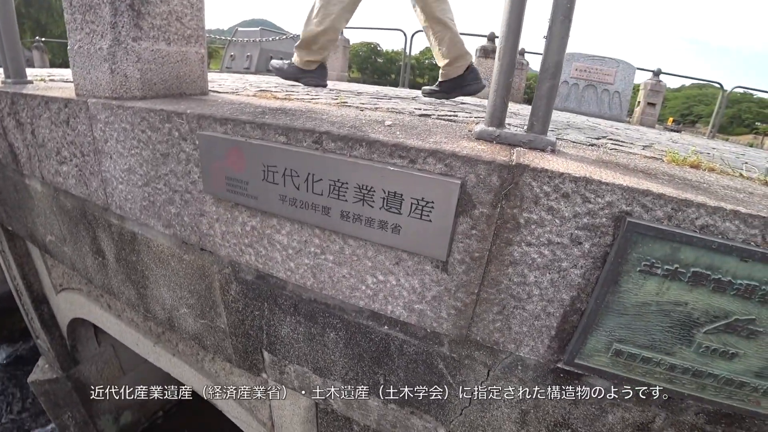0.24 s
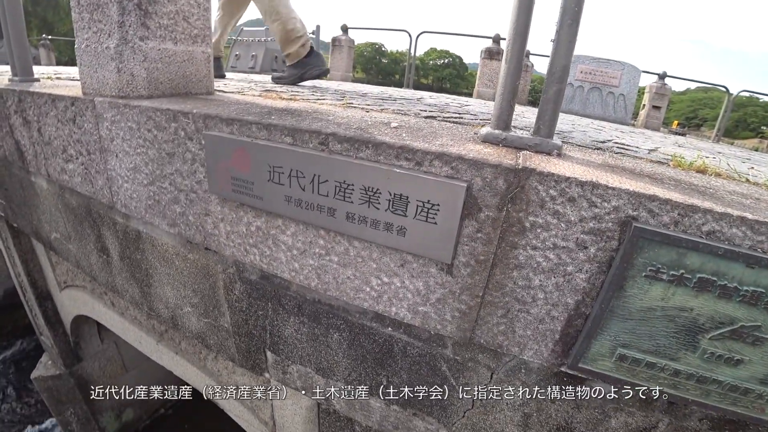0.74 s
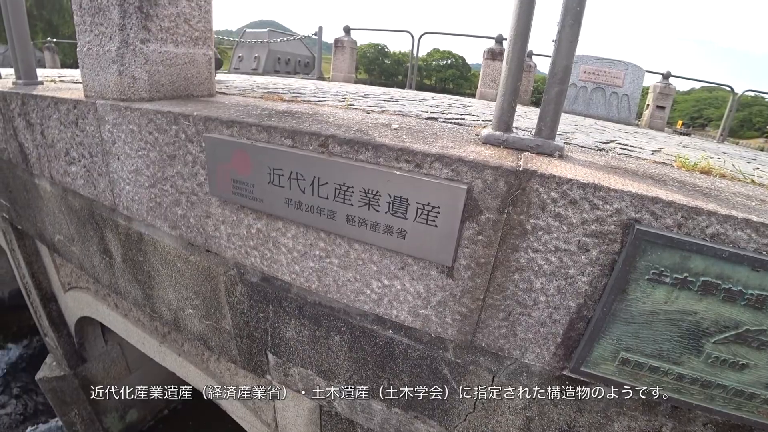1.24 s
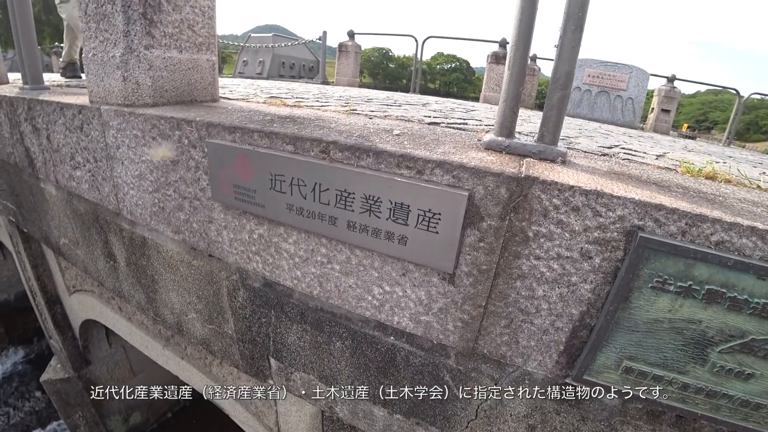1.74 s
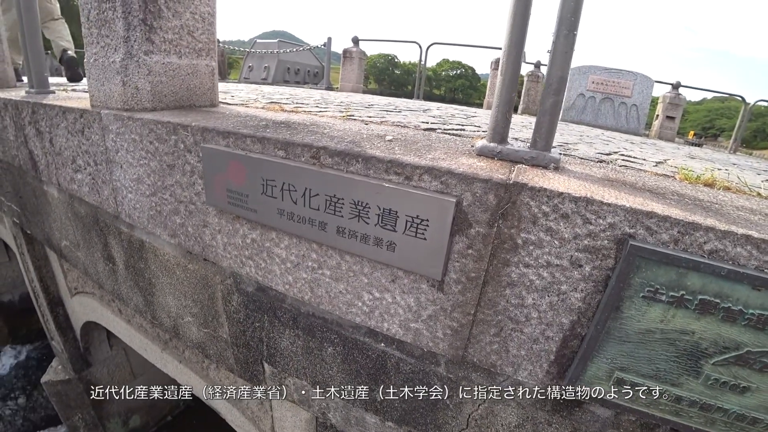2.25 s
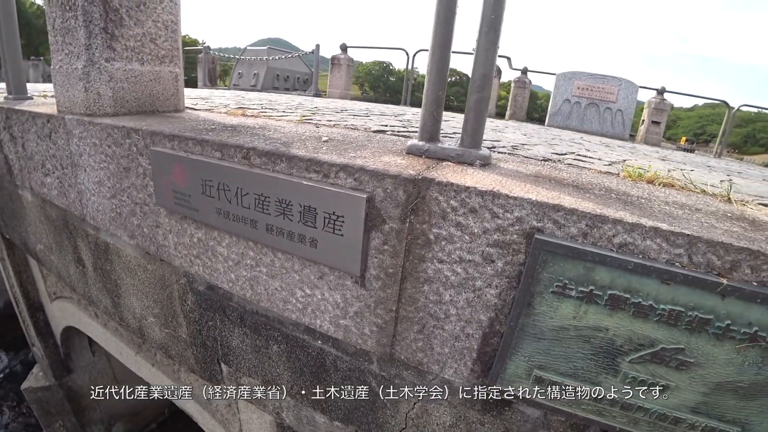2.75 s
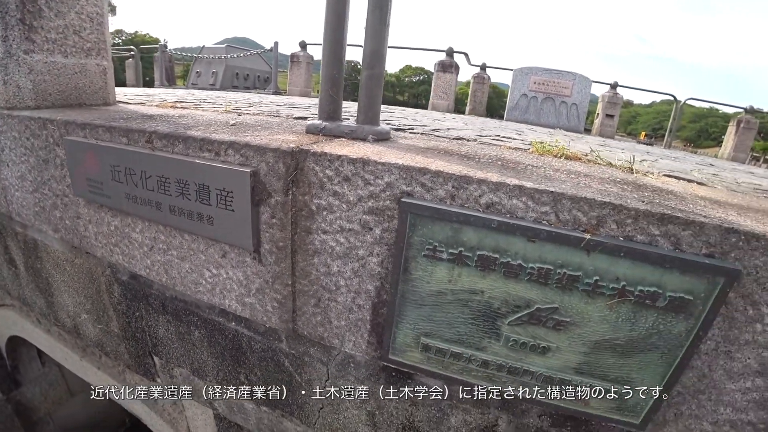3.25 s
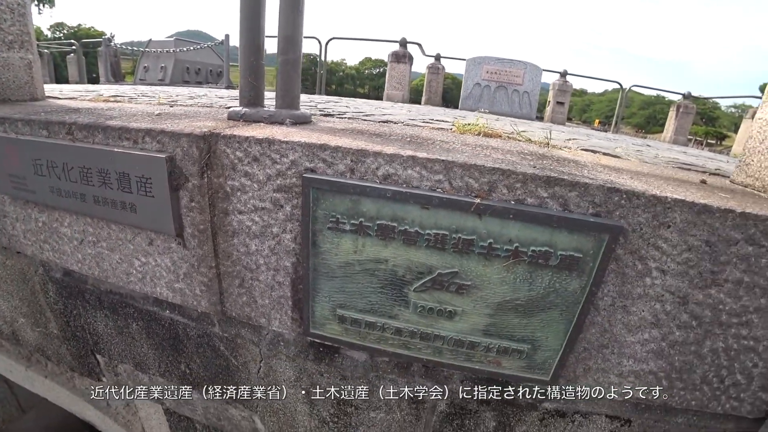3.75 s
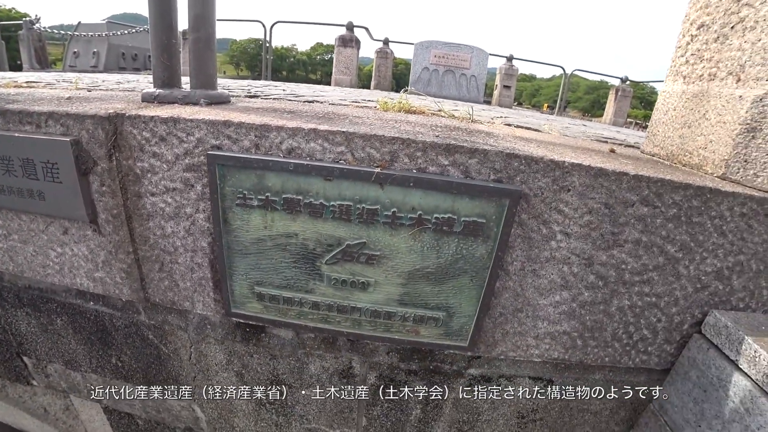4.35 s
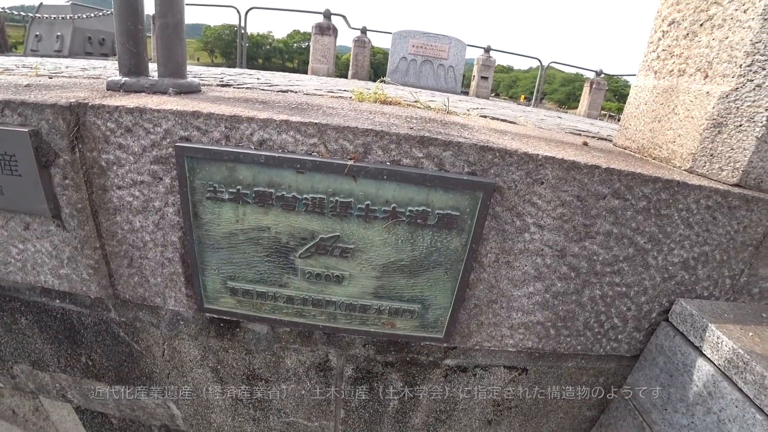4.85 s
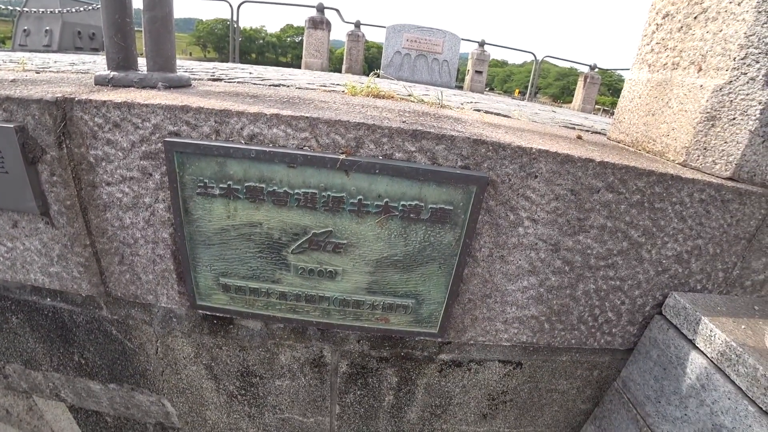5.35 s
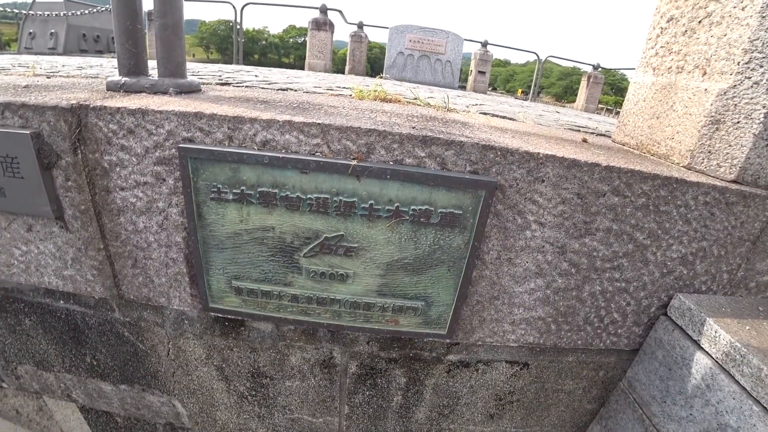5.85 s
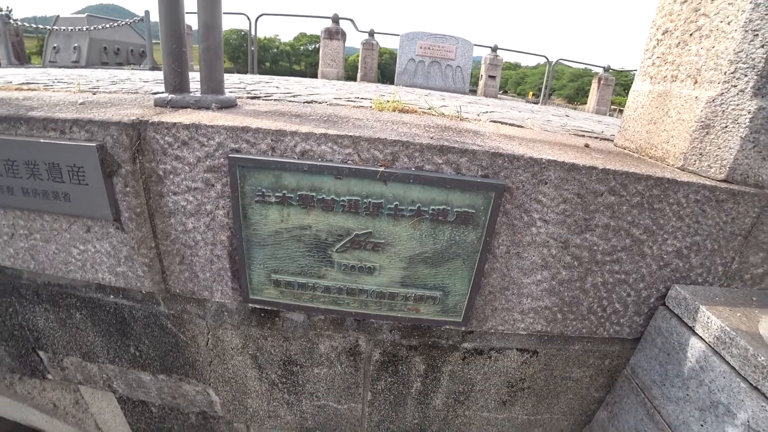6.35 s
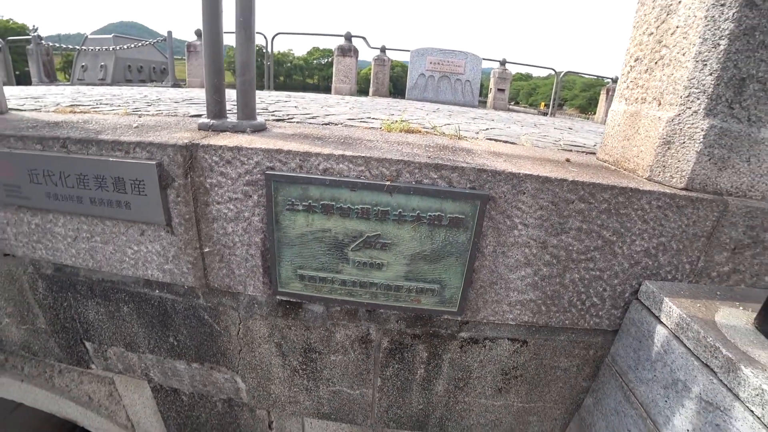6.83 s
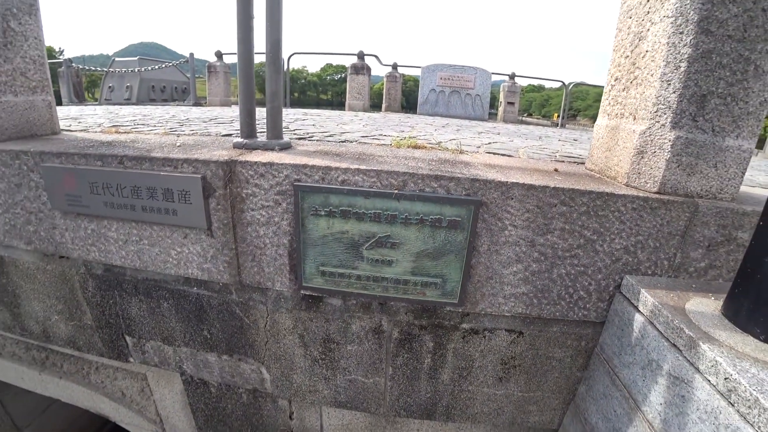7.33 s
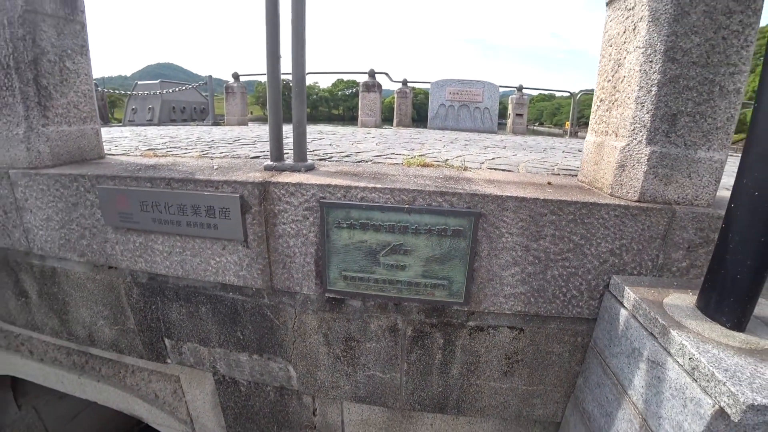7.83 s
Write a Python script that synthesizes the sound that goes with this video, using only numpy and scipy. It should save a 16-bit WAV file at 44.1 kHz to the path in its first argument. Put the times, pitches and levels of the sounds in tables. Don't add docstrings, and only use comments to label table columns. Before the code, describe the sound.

A continuous rush of water falls through a gate under a stone bridge, heard outdoors from just above through a small stereo hand-held microphone. Mid-range roar and churning foam dominate, with crisp hissing spray above and a weak hollow arch boom below. The flow heaves gently, fullest around 1.5 to 2 seconds, easing near 2.8 and 4.7, and rising slightly again at 6.4. Rapid small splashes flutter throughout, with sharper ones near 0.3, 2.3, 4.0, 4.4, 4.7 and 7.6. Tiny clear bubbles ring briefly, most noticeably at 2.2, then around 3.3 and 6.2, with immediate stone reflections. From about 3 to 6.7 the treble spreads wider as the camera turns, then draws together towards 7.6. Nearly buried low gulps come after 3.6; faint breeze puffs touch 5.9 and 7.1. The water continues to the end at 8.1.

```python
import sys
import numpy as np
from scipy import signal
from scipy.fft import rfft, irfft, next_fast_len
from scipy.io import wavfile
from scipy.ndimage import uniform_filter1d, map_coordinates

SR = 44100
rng = np.random.default_rng(int(sys.argv[2]) if len(sys.argv) > 2 else 0)


def bounce(signal):
    frames = np.transpose(np.atleast_2d(signal))
    limited = np.clip(frames, -1, 1)
    pcm = np.round(limited * 32767).astype(np.int16)
    wavfile.write(sys.argv[1], SR, pcm)


def gain_from_decibels(decibels):
    exponent = np.asarray(decibels, float) / 20
    return 10 ** exponent


N = 356769

# (time [s], level [dB])
FLOW_CURVE = [(0.0, 1.3), (0.75, 0.45), (1.5, 2.6), (2.3, 0.64), (2.8, -1.4), (3.6, 0.5), (4.7, -2),
              (5.3, 0.2), (5.8, -1.5), (6.4, 1.8), (7.2, -0.8), (8.09, 0.7)]
# (time [s], swell [dB], half length [ms], extra roar weight [dB])
FALL_SURGES = [(0.13, 2.2, 51, -1), (0.56, 2.5, 59, 1), (1.04, 1.5, 120, 0), (1.21, 0.7, 79, 1.8),
               (1.41, 2.2, 100, 0), (1.75, 3, 63, -1), (2.15, 2, 150, 0.5), (2.34, 3, 47, -0.6),
               (2.68, 2.4, 140, -2.8), (2.98, 2.5, 60, -2.5), (3.15, 1.5, 45, 0.8), (3.32, 2, 51, 1.5),
               (3.55, 0.8, 40, 1), (3.73, 1.5, 57, -0.7), (3.93, 1.5, 60, -0.5), (4.2, 1.5, 110, -0.2),
               (4.56, 1.5, 110, 0.7), (5.24, 1.7, 100, 0.8), (5.42, 1.1, 100, 0.2), (5.77, 2, 82, -1.5),
               (6.18, 2, 51, -1.5), (6.44, 0.7, 74, -0.5), (6.62, -0.5, 70, 0), (6.8, -2, 82, -0.8),
               (6.93, 2, 41, -1), (7.21, 1.8, 79, -2), (7.46, 2.1, 88, -2), (7.9, 1.5, 91, -0.5)]
# (time [s], swell [dB], heaviness [0-2.3], length [ms])
FOOT_SPLASHES = [(0.133, 0.5, .6, 32), (0.344, 7, 2.3, 7), (0.529, 3, .7, 18), (0.721, 5, 0.76, 11),
                 (0.93, 3, 1.9, 14), (1.015, 5, 1.4, 14), (1.431, 4, 0.6, 37), (2.302, 5, 0, 12),
                 (2.337, 3.5, 1.4, 26), (2.616, 2, 1.2, 28), (2.773, 6, 0.4, 5), (2.967, 3, .8, 9.1),
                 (3.135, 5, .7, 24), (3.329, 5.5, 1.01, 19), (3.533, 4, .9, 18), (3.722, 6, 1.01, 17),
                 (4.031, 9, 0.5, 7), (4.372, 9, .1, 9.2), (4.62, 5.3, 1.1, 8), (4.659, 8, 1.5, 8),
                 (4.803, 4, 0.54, 11), (4.958, 0, 0.57, 7), (5.266, 4, 0.56, 20), (5.453, 4, 1.4, 46),
                 (5.652, 6, .6, 19), (6.104, 7, .7, 8), (6.608, 3, 1.8, 32), (6.921, 4, 1, 17),
                 (7.603, 7.5, 0.33, 13), (7.829, 3.5, 0.73, 30)]
# (frequency [Hz], density [dB per Hz])
FALL_COLOUR = [(110, -49), (180, -36), (387, 0), (574, 0.5), (1700, -1), (7710, -10.5), (8790, -14.5),
               (11200, -14), (14800, -25), (15700, -26)]
# (frequency [Hz], density [dB per Hz])
ARCH_COLOUR = [(140, -55), (190, -19.5), (230, -11), (270, -4), (350, 1.5), (420, -0.5), (520, -9),
               (800, -40)]
# (frequency [Hz], density [dB per Hz])
DEEP_COLOUR = [(15, -45), (25, -30), (43, -13.5), (172, 0), (240, 3.5), (310, -27), (530, -120)]
# (time [s], level [dB])
BREEZE_CURVE = [
    (0, -82),
    (3.2, -89),
    (3.8, -76),
    (4.9, -85),
    (5.9, -59),
    (6.7, -79),
    (7.1, -61),
    (7.6, -71),
    (8.09, -69),
]
# (peak time [s], peak level [dB], pitch [Hz], pitch spread [Hz])
CLEAR_BUBBLES = [(0.3178, -25, 7160, 1010), (0.9295, -21, 6000, 870), (1.2909, -28, 9580, 870),
                 (1.4121, -22, 4970, 1000), (1.4259, -28, 9900, 1000), (1.5267, -24, 7790, 855),
                 (2.1638, -12, 3040, 840), (2.3002, -32, 13100, 3800), (2.3351, -28, 7640, 860),
                 (2.438, -19.5, 2440, 860), (2.716, -22, 6480, 1700), (2.7347, -20, 3180, 1190),
                 (2.7726, -32, 11800, 1720), (3.1347, -18.5, 6100, 1400), (3.3185, -17, 6200, 1700),
                 (3.3299, -23, 9780, 1370), (3.5331, -20, 3900, 1920), (3.758, -19, 6600, 1710),
                 (4.3124, -23, 5880, 1000), (4.4756, -24, 3470, 860), (4.6208, -25, 10600, 860),
                 (4.8029, -29, 12500, 1010), (5.205, -24, 2850, 900), (5.447, -24, 2450, 600),
                 (5.8892, -26, 5760, 860), (6.1644, -21, 6680, 990), (6.1956, -16.5, 3600, 870),
                 (6.2592, -31, 9400, 860), (6.592, -21, 3050, 900), (7.8302, -21, 4290, 1390)]
# (peak time [s], peak level [dB], pitch [Hz], pitch rise [Hz], length [ms])
AIR_POCKETS = [(3.59, -58, 151, 54, 60), (4.075, -60, 156, 0, 42), (4.54, -64, 150, 10, 70),
               (4.81, -62, 160, 20, 34), (5.318, -57, 171, -10, 75), (5.39, -59, 148, 0, 50),
               (5.575, -62, 117, 24, 40), (6.095, -55, 107, 40, 53), (6.338, -60, 143, -20, 59),
               (6.64, -64, 156, 0, 58), (6.93, -60, 170, 20, 55), (7.46, -69, 134, -4, 50),
               (7.598, -65, 105, 10, 29), (8.0, -68, 89.5, 25, 92)]
# (delay [ms], level [dB])
WALL_ECHOES = [
    (3.7, -9),
    (7.9, -18),
]
# (time [s], turned from the arch [0-1], stepped back [0-1])
CAMERA_MOVES = [(0, .3, 0.35), (.6, 0.16, 0), (1.7, 0.15, 0.25), (2.9, 0.56, 0.35), (3.5, 0.75, 0.65),
                (3.9, 0.84, 0.7), (4.6, 0.95, 0.46), (5.3, 0.65, 0.74), (5.8, .9, 0.86), (6.7, 0.7, .9),
                (7.0, 0.4, 1), (7.6, 0, 0.73), (8.09, 0.05, 0.7)]
# (frequency [Hz], likeness [0-1])
PORT_LIKENESS = [(150, 1), (500, 0.99), (750, .92), (1100, 0.9), (1600, 0.64), (3200, 0.78), (4500, 0.92),
                 (6000, 0.95), (7700, 0.98), (9200, 0.81), (11000, 0.7), (13000, 0.4), (15000, 0.45)]
# (frequency [Hz], phase [rad])
LEFT_LEAD = [(120, 0), (200, -.28), (500, -.5), (1100, -.73), (1600, -.68), (3200, -.27), (4500, -.08),
             (7700, .04), (11000, .55), (13000, .75), (15500, .4)]
# (frequency [Hz], level [dB])
LEFT_TILT = [(60, 1), (150, 0), (380, 0.5), (950, 1.5), (2380, 0.5), (5980, 0.0), (15000, 0.5)]

ROAR_DB, CHURN_DB, SPRAY_DB, BOOM_DB, DEEP_DB = -32.5, -30.5, -34, -47.5, -65
ROAR_DB_PER_DB, CHURN_DB_PER_DB, SPRAY_DB_PER_DB, BOOM_DB_PER_DB = 0.47, 0.86, 0.79, 1.34
UNREST_DB, UNREST_KNOTS_PER_S = 0.15, 8.1
SMALL_DB, SMALL_MS, SMALL_HEAVY = 4, 12.5, 0.83
TURN_WIDENS_DB, TURN_WIDENS_TOP_DB, TURN_SHADES_BOOM_DB = 13.5, 1, 1
FAR_ROAR_DB, FAR_SPRAY_DB, FAR_BOOM_DB, FAR_MIST_DB = 0.9, -1.86, -3.5, -0.5
FAR_WIDENS_DB, FAR_LEFT_DB = 4, 0.4
FACING_WIDTH_DB, NEAR_WIDTH_DB = -7, -3.5
TOP_HZ = 15830


def unit(x):
    return x / np.sqrt(np.mean(x ** 2) + 1e-20)


def along(points, hz):
    f, v = np.transpose(points)
    return np.interp(np.log(hz + 1), np.log(f + 1), v)


def curves(rows):
    s, *cols = np.transpose(rows)
    return [np.interp(np.arange(N) / SR, s, c) for c in cols]


def wobble(knots_per_s):
    knots = rng.standard_normal(int(N * knots_per_s / SR) + 4)
    return map_coordinates(knots, [np.arange(N) * knots_per_s / SR])


def filtered(x, response):
    m = next_fast_len(N + 8192)
    return irfft(rfft(x, m) * response(np.fft.rfftfreq(m, 1 / SR)), m)[..., :N]


def above(hz, edge_hz):
    return 1 / (1 + (edge_hz / (hz + 1)) ** 8)


def bubbles(peak_s, db, hz, life_s, rise, size):
    t = np.arange(size) / SR
    u = t / life_s[:, None]
    tone = np.sin(2 * np.pi * hz[:, None] * t * (1 + rise[:, None] * (u - 2) / 2))
    wave = gain_from_decibels(db)[:, None] * (u * np.exp(1 - u)) ** 2 * tone
    at = np.round((peak_s - life_s) * SR).astype(int)[:, None] + np.arange(size)
    return np.bincount(np.clip(at, 0, N).ravel(), wave.ravel(), N + 1)[:N]


def surges():
    s, db, ms, weight_db = np.transpose(FALL_SURGES)[:, :, None]
    steps_s = np.arange(0, N, 64) / SR
    bells = np.exp(-((steps_s - s) / (ms / 1000)) ** 2)

    def fine(v):
        return np.interp(np.arange(N) / SR, steps_s, v)

    flow_db = curves(FLOW_CURVE)[0] + fine((db * bells).sum(0))
    return flow_db, fine((weight_db * bells).sum(0))


def splashes(count=24):
    swell_db = np.zeros((2, N + SR))
    scale = [N / SR - 0.2, SMALL_DB, SMALL_HEAVY, SMALL_MS]
    least = [0.1, SMALL_DB / 2, 0.3, SMALL_MS / 2]
    small = rng.random((count, 4)) * scale + least
    for s, db, heavy, ms in [*FOOT_SPLASHES, *small]:
        u = np.arange(-2000, 3000) / SR / (0.00043 * np.clip(ms, 4, 40))
        bump = np.exp(-u ** 2)
        swell_db[:, round(s * SR) - 2000:][:, :len(u)] += np.outer([0.71 * db, 0.42 * heavy * db], bump)
    return swell_db[:, :N]


def sheet(low_hz, high_hz, colour, patchy_db=0, froth=0):
    pair = rng.standard_normal((2, N))
    if patchy_db:
        z = signal.stft(pair, nperseg=256)[2]
        field = uniform_filter1d(rng.standard_normal(z.shape[1:]), size=7, axis=0)
        field = uniform_filter1d(field, size=5, axis=1)
        patchy = z * gain_from_decibels(patchy_db * unit(field))
        pair = unit(signal.istft(patchy, nperseg=256)[1][:, :N])

    def band(hz):
        share = np.sqrt(above(hz, low_hz) / (1 + (hz / high_hz) ** 8))
        return share * gain_from_decibels(along(colour, hz))

    return unit(filtered(pair + froth, band))


def foam(centre_hz, spread, cycles, uneven_db, count, size):
    s = rng.random(count) * N / SR
    bell, odd = rng.standard_normal(count), rng.exponential(size=count)
    hz = np.clip(centre_hz * np.exp(spread * bell), 400, 15500)
    life_s = np.minimum(cycles / hz, size / SR / 5)
    cloud = bubbles(s, uneven_db * np.minimum(odd, 3.2), hz, life_s, 0 * hz + 0.043, size)
    return unit(cloud) * [[1], [0]]


def fall():
    flow_db, weight_db = surges()
    turned, far = curves(CAMERA_MOVES)
    spray_swell_db, churn_swell_db = splashes()
    flutter_db = 0.28 * wobble(12) + 0.46 * wobble(50) + 0.7 * wobble(130)

    def level(db, db_per_db, far_db):
        unrest_db = UNREST_DB * wobble(UNREST_KNOTS_PER_S)
        return gain_from_decibels(db + db_per_db * flow_db + far_db * far + unrest_db)

    roar = sheet(452, 1336, FALL_COLOUR, 0.59)
    roar = unit(gain_from_decibels(0.099 * flutter_db + 0.14 * churn_swell_db) * roar)

    fizz = foam(2100, 0.424, 4.39, 0.87, count=1800, size=500)
    ringing = foam(2296, 0.35, 11, 2.2, count=900, size=1200)
    churn = sheet(1253, 4380, FALL_COLOUR, 0.55, 0.1 * fizz + 0.13 * ringing)
    churn = unit(gain_from_decibels(0.9 * flutter_db + churn_swell_db) * churn)

    droplets = foam(10000, 0.367, 11, 1.9, count=4000, size=220)
    spray = sheet(4340, 18000, FALL_COLOUR, 0.5, 0.28 * droplets)
    mist = filtered(spray, lambda hz: 1 / (1 + (10000 / (hz + 1)) ** 6))
    mist_db = 0.5 * spray_swell_db + 0.61 * wobble(60) + FAR_MIST_DB * (far - 0.5)
    spray = spray + (gain_from_decibels(mist_db) - 1) * mist
    spray = unit(gain_from_decibels(0.78 * flutter_db + 1.1 * spray_swell_db) * spray)

    boom_level = level(BOOM_DB - TURN_SHADES_BOOM_DB * turned, BOOM_DB_PER_DB, FAR_BOOM_DB)
    mix = boom_level * sheet(100, 427, ARCH_COLOUR)
    mix = mix + gain_from_decibels(DEEP_DB) * sheet(10, 240, DEEP_COLOUR)
    mix = mix + level(ROAR_DB + weight_db, ROAR_DB_PER_DB, FAR_ROAR_DB) * roar
    mix = mix + level(CHURN_DB, CHURN_DB_PER_DB, 0) * churn
    return mix + level(SPRAY_DB, SPRAY_DB_PER_DB, FAR_SPRAY_DB) * spray


def breeze():
    lumps = gain_from_decibels(4.8 * np.array([wobble(14), wobble(12)]))
    return gain_from_decibels(curves(BREEZE_CURVE)[0] - 1) * unit(lumps * sheet(55, 280, DEEP_COLOUR))


def pops():
    s, db, hz, spread_hz = np.transpose(CLEAR_BUBBLES)
    clear = bubbles(s, db, hz, 1.05 / spread_hz, 0 * s + 0.011, size=400)

    def wall(f):
        return 1 + sum(gain_from_decibels(db) * np.exp(-2j * np.pi * f * ms / 1000) for ms, db in WALL_ECHOES)

    return filtered(clear, wall)


def gulps():
    s, db, hz, rise_hz, ms = np.transpose(AIR_POCKETS)
    return bubbles(s, db + 7, hz, 0.00035 * ms, 0.72 * rise_hz / hz, size=8000)


def ports(pair, lone):
    halves = np.array([[0.5], [-0.5]])

    def angle(hz):
        return np.arccos(np.clip(along(PORT_LIKENESS, hz), 0, 1)) / 2

    def lead(hz):
        return gain_from_decibels(along(LEFT_TILT, hz) * halves) * np.exp(1j * along(LEFT_LEAD, hz) * halves)

    def zones(hz):
        return np.array([1 - above(hz, 3500), above(hz, 3700) - above(hz, 8900), above(hz, 8200)])

    shared = filtered(pair[0], lambda hz: np.cos(angle(hz))) + lone
    apart = filtered(pair[1], lambda hz: np.sin(angle(hz)))
    left, right = filtered(np.array([shared + apart, shared - apart]), lead)
    low, middle, top = filtered((left - right) / 2, zones)
    turned, far = curves(CAMERA_MOVES)
    middle_db = FACING_WIDTH_DB + TURN_WIDENS_DB * turned + 2.4 * wobble(12)
    top_db = NEAR_WIDTH_DB + FAR_WIDENS_DB * far + TURN_WIDENS_TOP_DB * turned + 0.74 * wobble(15)
    side = low + gain_from_decibels(middle_db) * middle + gain_from_decibels(top_db) * top
    both = (left + right) / 2 + np.array([side, -side])
    return both * gain_from_decibels(FAR_LEFT_DB * (far - 0.3) * halves)


def scene():
    return ports(gain_from_decibels(0.07) * fall(), pops() + gulps()) + breeze()


def top_cut(x):
    return signal.sosfilt(signal.butter(12, 15840, fs=SR, output="sos"), x)


def record(dry):
    mix = filtered(dry, lambda hz: hz < TOP_HZ)
    return top_cut(mix)


dry = scene()
out = record(dry)
bounce(out)
```